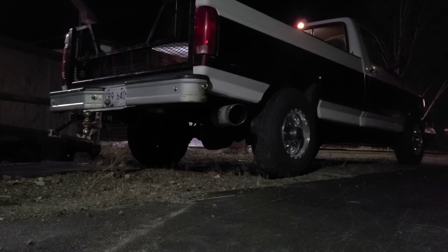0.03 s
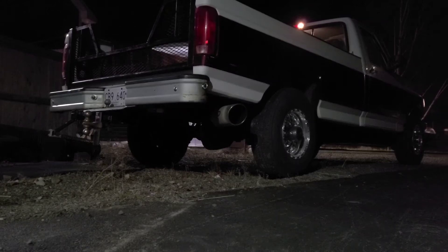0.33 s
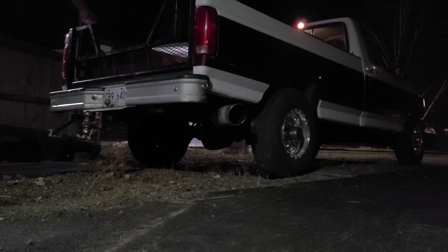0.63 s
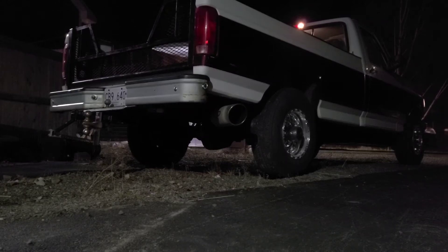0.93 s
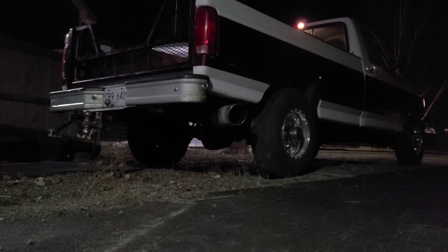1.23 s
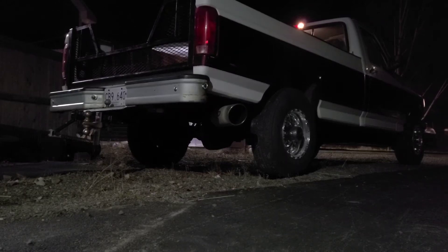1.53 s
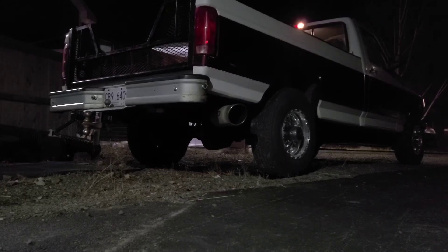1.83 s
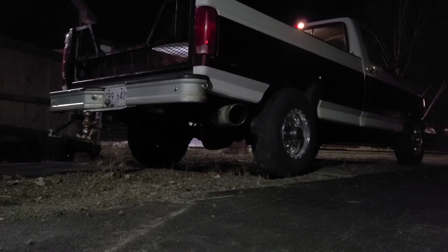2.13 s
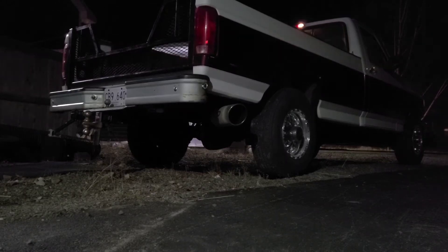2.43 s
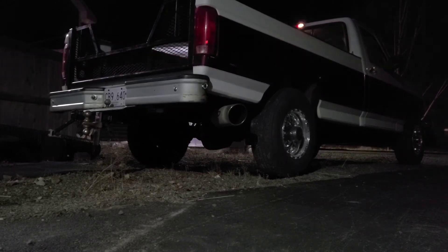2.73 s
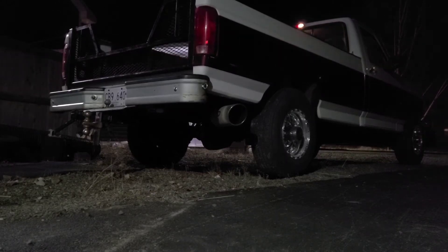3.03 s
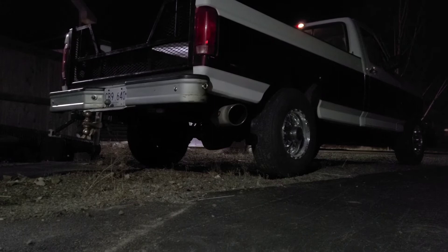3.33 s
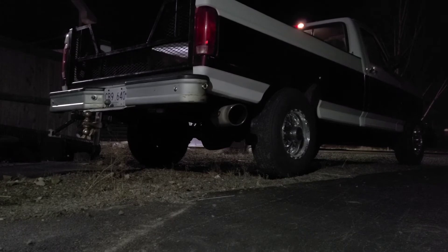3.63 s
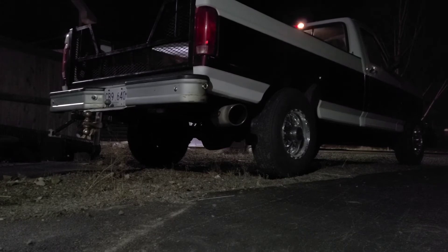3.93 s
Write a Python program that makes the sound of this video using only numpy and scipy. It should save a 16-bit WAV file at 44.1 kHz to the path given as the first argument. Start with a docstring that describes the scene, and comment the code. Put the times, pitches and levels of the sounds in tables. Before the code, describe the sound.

A diesel truck starts outdoors, heard from close behind. After soft wind and a faint electric buzz, the starter clanks and cranks in quickening, whining pulses until the cylinders fire with hard knocks and a barking exhaust.

```python
"""A diesel pickup starts from cold on a quiet night, heard from behind, near its tailpipe.
First a light breeze bumps the microphone over a distant hush and a faint electric buzz. At 2.3 s the
starter clacks in, then grinds and whines under each compression stroke as pumped air rings the tailpipe.
From 3.5 s the cylinders catch one by one with hard knocks, and from 3.7 s the exhaust thumps and barks."""
import sys
import numpy as np
from scipy import signal
from scipy.fft import rfft, irfft, next_fast_len
from scipy.io import wavfile
from scipy.ndimage import uniform_filter1d, map_coordinates

SR = 44100
rng = np.random.default_rng(int(sys.argv[2]) if len(sys.argv) > 2 else 0)


def transcribe(u):
    """Save the signal u as a 16-bit wav file named by the first command-line argument.

    u: samples, shape (n,) or (channels, n), limited to [-1, 1]; the rate is SR.
    q: integer samples, one column per channel.
    """
    v = np.clip(np.atleast_2d(u).T, -1, 1)
    q = np.round(v * 32767).astype(np.int16)
    wavfile.write(sys.argv[1], SR, q)


N = 176400
TIME = np.arange(N) / SR
HALF_EACH_WAY = np.array([[.5], [-.5]])  # shares a left-minus-right difference between the channels


def amp(db):
    """Amplitude grows tenfold for every 20 dB."""
    return 10 ** (np.asarray(db) / 20)


def along(points, hz):
    """Interpolation of (frequency, value) points on a logarithmic frequency axis."""
    corner_hz, values = np.transpose(points)
    return np.interp(np.log(hz + 1), np.log(corner_hz + 1), values)


def wobble(rate):
    """Smooth random modulation: a spline through `rate` Gaussian values a second."""
    return map_coordinates(rng.standard_normal(4096), [TIME * rate], mode="wrap")


def filtered(x, response):
    """Linear filtering: the spectrum is multiplied by a frequency response."""
    size = next_fast_len(N + SR // 2)
    return irfft(rfft(x, size) * response(np.fft.rfftfreq(size, 1 / SR)), size)[..., :N]


# Likeness of the truck's sound in the two channels. Each row: frequency in Hz, correlation.
COHERENCE = [(60, 0.97), (600, 0.98), (1300, 0.48), (2800, 0.69), (5500, 0.55), (12000, 0.085)]


def spread(pair, coherence=COHERENCE):
    """Partial coherence: two independent signals mix as mid and side into stereo of rms 1."""
    def weights(hz):
        angle = np.arccos(np.clip(along(coherence, hz), -1, 1)) / 2
        return np.array([np.cos(angle), np.sin(angle)])
    mid, side = filtered(pair, weights)
    stereo = np.array([mid + side, mid - side])
    return stereo / np.sqrt(np.mean(stereo ** 2) + 1e-20)


def noise(spectrum, coherence=COHERENCE, gate=1):
    """Source and filter: white noise is modulated by a gate, then coloured; stereo, rms 1."""
    source = gate * rng.standard_normal((2, N))
    return spread(filtered(source, lambda hz: amp(along(spectrum, hz))), coherence)


def burst(start, attack, t60):
    """Envelope of a damped transient: a linear rise, then a fall of 60 dB in t60 seconds."""
    envelope = np.zeros(N)
    span = slice(int(start * SR), int((start + attack + t60) * SR))
    age = np.arange(*span.indices(N)) / SR - start
    envelope[span] = np.clip(age / attack, 0, 1) * amp(-60 * np.maximum(age - attack, 0) / t60)
    return envelope


def struck(hits, modes, attack, scatter_db):
    """Modal superposition: each hit (s, dB) excites damped modes (Hz, dB, t60 s) in a random balance."""
    ringing = np.zeros(N + SR)
    age = np.arange(SR // 2) / SR
    shapes = np.array([amp(db - 60 * age / t60) * np.sin(2 * np.pi * hz * age) for hz, db, t60 in modes])
    shapes *= np.clip(age / attack, 0, 1)
    for start, db, *_ in hits:
        strengths = amp(db + scatter_db * rng.standard_normal(len(modes)))
        ringing[round(start * SR):][:len(age)] += strengths @ shapes
    return ringing[:N]


# Spectrum of the distant hush. Each row: frequency in Hz, relative level in dB.
HUSH_SPECTRUM = [(15, -72), (25, -29), (82, -6), (119, -10.5), (169, -9.5), (221, -18.5), (399, -20.5),
                 (433, -23.5), (567, -24.5), (919, -31.5), (1410, -28.5), (5280, -45.5), (5880, -41.5),
                 (7500, -56.5), (15500, -48.5)]
# Partials of the electric buzz. Each row: frequency in Hz, rms level in dB.
BUZZ_PARTIALS = [(406, -66.5), (5475, -85), (5679, -85), (5884, -89.5), (6085, -84), (6288, -82.5)]


def night():
    """A diffuse field, coherent only at long wavelengths, lies under a steady electric buzz."""
    hush = amp(-47.5) * noise(HUSH_SPECTRUM, coherence=[(60, 1.0), (300, 0.67), (1200, 0)])
    buzz = sum(amp(db) * np.sqrt(2) * np.sin(2 * np.pi * hz * TIME) for hz, db in BUZZ_PARTIALS)
    return hush + buzz


# Course of the breeze. Each row: time in seconds, relative level in dB, left minus right in dB.
GUSTS = [(0.0, -49, -2), (0.15, -63, 0), (0.18, -41.5, 16), (0.25, -66, -6.0), (0.38, -44, 9),
         (0.59, -55, -6), (0.92, -55, 6), (1.05, -49, -12), (1.12, -56, 3.5), (1.27, -45, -9),
         (1.56, -35, -13), (1.6, -32, 2.5), (1.83, -34, -7.5), (1.87, -40.5, 14), (1.92, -40, 14.5),
         (1.96, -46, -16), (2.05, -47.5, -15), (2.32, -33.5, 7.5)]
# Spectrum of the buffeting. Each row: frequency in Hz, relative level in dB.
GUST_SPECTRUM = [(20, -10), (45, 0.5), (80, 3), (130, -12.5), (190, -15.5), (300, -31.5), (600, -53.5),
                 (1300, -100)]


def breeze(gain_db=5.5, flicker_db=3.7):
    """Turbulent pressure is local, so each microphone port rumbles independently."""
    times, level_db, balance_db = np.transpose(GUSTS)
    ports_db = np.interp(TIME, times, level_db, right=-43)
    ports_db = ports_db + np.interp(TIME, times, balance_db, right=0) * HALF_EACH_WAY
    ports_db = uniform_filter1d(ports_db, size=900, axis=1)
    envelope = amp(gain_db + ports_db + flicker_db * wobble(22.03))
    return envelope * noise(GUST_SPECTRUM, coherence=[(60, 0)])


# Modes of the bell housing and frame. Each row: frequency in Hz, bandwidth in Hz, relative gain in dB.
HOUSING_MODES = [(300.7, 20.6, -0.5), (449, 21, 6), (523, 18, 0.5), (593, 18, 2), (708, 26, 4),
                 (754.6, 8.9, 7.5), (902, 38, -0.5), (942, 29, 1.5), (990, 84, -0.5), (1255, 70, 0.5),
                 (1442, 93, -3.5), (1790, 97, -6), (2250, 390, -9)]


def housing(force):
    """Forced vibration: the bell housing and frame respond as resonators of alternating sign."""
    def response(hz):
        return sum((-1) ** k * amp(db) * 1j * hz * width / (centre ** 2 - hz ** 2 + 1j * hz * width)
                   for k, (centre, width, db) in enumerate(HOUSING_MODES))
    return spread(filtered(force, response))


# Impacts of solenoid, pinion and ring gear.
# Each row: start in seconds, clank level in dB, click level in dB, t60 in seconds.
PINION_IMPACTS = [(2.337, -33.5, -37.5, 0.36), (2.362, -22.5, -26, 0.11), (2.378, -16, -36, 0.11)]
# Spectrum of the clicks and of the starter's rasp. Each row: frequency in Hz, relative level in dB.
RASP_SPECTRUM = [(1500, -10.5), (2900, -1.5), (3800, -12.5), (4900, -10), (6200, -7.5), (7400, -11.5),
                 (8200, -11), (9500, -19), (11200, -11.5), (13500, -21), (16000, -20.5)]


def engagement():
    """Impact excitation: the solenoid throws the pinion into the ring gear and the housing clanks."""
    clank = sum(amp(db) * burst(start, 0.00069, t60) for start, db, _, t60 in PINION_IMPACTS)
    click = sum(amp(db) * burst(start, 0.0015, t60) for start, _, db, t60 in PINION_IMPACTS)
    return clank * housing(rng.standard_normal((2, N))) + click * noise(RASP_SPECTRUM)


# Compression strokes. Each row: start, rasp rise time and length in seconds, gear and rasp levels in dB.
COMPRESSIONS = [(2.398, 0.09, 0.24, -3, -1), (2.714, 0.036, 0.18, 0, 0.5), (2.886, 0.018, 0.15, 0, 2),
                (3.052, 0.012, .13, 1.5, 2.5), (3.192, 0.0086, 0.114, 0.5, 3), (3.314, 0.01, .11, 2, 2.5),
                (3.444, 0.0098, 0.082, 1, 6), (3.558, 0.0052, 0.0734, 1, 6.5), (3.637, 0.016, .07, -1, 9.5)]


def compression(rasp_lead_s=0.091, rasp_t60=0.58):
    """Compressed air resists the piston: each stroke gives an arch of gear load and a swell of rasp."""
    load, scrape = np.zeros((2, N))
    for start, rise, length, gear_db, rasp_db in COMPRESSIONS:
        age = TIME - start
        span = (age > 0) & (age < length)
        load[span] += amp(gear_db) * np.sin(np.pi * (age[span] / length) ** 0.95) ** 0.41
        fall_db = 60 * np.maximum(age - (length - rasp_lead_s), 0) / rasp_t60
        scrape = np.maximum(scrape, np.clip(age / rise, 0, 1) * amp(rasp_db - fall_db))
    return load, scrape


# Starter speed, which sags on each compression.
# Each row: time in seconds, gear mesh frequency in Hz, relative whine level in dB.
MESH_COURSE = [(2.37, 330, -13), (2.45, 445, -9), (2.55, 524.3, -9), (2.6, 600.6, 3.5), (2.66, 745, 2.5),
               (2.74, 745, -3.5), (2.795, 599.5, 1.5), (2.86, 753, 3), (2.9, 724, -16), (2.95, 601.8, 5),
               (3.04, 746.2, -12.5), (3.104, 608.3, 3), (3.149, 559.4, -10.5), (3.225, 696.6, 3),
               (3.27, 620.2, -20), (3.346, 701.8, 5), (3.372, 692.3, -16), (3.405, 754, 7),
               (3.435, 740, -17), (3.475, 630, 4), (3.54, 616.4, -19)]
# Harmonics of the gear whine. Each row: multiple of the mesh frequency, relative level in dB.
WHINE_HARMONICS = [(1, -30), (2, -38.5), (3, -45.5), (4, -49)]
# Spectrum of the grinding teeth. Each row: frequency in Hz, relative level in dB.
GRIND_SPECTRUM = [(90, -14), (230, -3.5), (440, 4.5), (545, -15), (700, -4), (830, -2.5), (1000, -10),
                  (1450, 1.5), (1600, -2.5), (2200, -5), (2650, -8), (3050, -8.5), (3400, -9), (3800, -29),
                  (6000, -30), (10000, -70)]


def starter(on_s=2.365, off_s=3.76, fade_s=0.01, inrush=2.5, inrush_s=0.39, flutter=0.012):
    """Gear meshing: periodic tooth contact whines and modulates friction noise that grows with load."""
    load, scrape = compression()
    running = np.clip((TIME - on_s) / fade_s, 0, 1) * np.clip((off_s - TIME) / fade_s, 0, 1)
    age = np.maximum(TIME - on_s, 0)
    # The motor strains harder while it first gathers speed.
    base_load = 0.26 * (1 + inrush * np.exp(-(age / inrush_s) ** 4))
    strain = np.maximum(load, base_load)
    times, pitches, whine_db = np.transpose(MESH_COURSE)
    mesh_hz = np.interp(TIME, times, pitches) * (1 + flutter * wobble(130))
    phase = 2 * np.pi * np.cumsum(mesh_hz) / SR
    teeth = amp(1.5 * np.cos(phase) + 0.75 * wobble(350))
    harmonics = sum(amp(db + 3.4 * wobble(70)) * np.sin(k * phase) for k, db in WHINE_HARMONICS)
    whine = np.sqrt(2) * amp(np.interp(TIME, times, whine_db)) * harmonics
    ring = amp(-28.5) * housing(teeth * rng.standard_normal((2, N)))
    grind = amp(-30) * noise(GRIND_SPECTRUM, gate=teeth)
    rasp = amp(-35) * (0.14 + scrape) * noise(RASP_SPECTRUM, gate=teeth)
    return running * (whine + strain * (ring + grind) + rasp)


# Air pumped out while cranking. Each row: start in seconds, relative level in dB.
AIR_PUFFS = [(2.406, -23.5), (2.646, -21.5), (2.799, -28), (2.904, -33), (3.08, -34.5), (3.201, -29),
             (3.36, -33), (3.484, -21.5), (3.599, -18.5), (3.66, -20)]
# Modes of the tailpipe. Each row: frequency in Hz, relative level in dB, t60 in seconds.
PIPE_MODES = [(37.5, -4, 0.083), (73.6, -1.5, 0.3), (108.6, -2, 0.47), (155, -11, .2)]


def puffs():
    """Air-column resonance: each soft puff from the cylinders rings the tailpipe."""
    return amp(1) * struck(AIR_PUFFS, PIPE_MODES, attack=0.0059, scatter_db=3)


# Ignitions. Each row: start in seconds, knock level in dB, sizzle level in dB, t60 in seconds.
IGNITIONS = [(3.525, -24.5, -47, 0.096), (3.611, -21, -42, 0.15), (3.652, -16, -33, 0.064),
             (3.686, -8, -21, 0.038), (3.718, -9.5, -17, 0.037), (3.745, -15.5, -19, 0.073),
             (3.77, -12.5, -15.5, 0.031), (3.818, -12, -15.5, 0.049), (3.843, -10.5, -12, 0.059),
             (3.877, -18, -19.5, 0.12), (3.899, -21, -25.5, 0.15), (3.915, -23.5, -27, 0.12),
             (3.955, -19, -27.5, 0.095), (3.986, -25, -58, .08)]
# Spectra of the block's knock and of the sizzle. Each row: frequency in Hz, relative level in dB.
BLOCK_SPECTRUM = [(300, 2), (770, -4.5), (1000, -14), (1200, -0.5), (1450, -6), (1900, 0), (2250, -4),
                  (2600, -4.5), (3050, 2.5), (3500, 0), (4100, -17), (5000, -15), (9000, -57)]
SIZZLE_SPECTRUM = [(2500, -39), (4150, -22), (4700, -1), (5200, -2.5), (5700, 2), (6200, -2.5),
                   (7400, -6.5), (8400, -1.5), (9900, -12.5), (11400, -3.5), (13000, -13), (16000, -7.5)]
# Modes of injection pump and manifolds. Each row: frequency in Hz, relative level in dB, t60 in seconds.
FITTING_MODES = [(1708, -5, 0.37), (2006, -4.5, 0.59), (2176, -3.5, 0.34), (2236, 1, 0.15),
                 (2937, -4, 0.091), (3030, 6, 0.13), (3150, -2, 0.13), (3310, -1, 0.13), (4540, -16, .15),
                 (5500, -6, 0.16), (8800, -9, .12)]


def combustion(rattle_db=2):
    """Diesel knock: each late cold ignition's pressure jump jolts the block and fittings, and sizzles."""
    knock = sum(amp(db) * burst(start, 0.0049, t60) for start, db, _, t60 in IGNITIONS)
    sizzle = sum(amp(db) * burst(start, 0.0048, t60) for start, _, db, t60 in IGNITIONS)
    rattle = amp(rattle_db * wobble(900))
    fittings = amp(-17) * struck(IGNITIONS, FITTING_MODES, attack=0.0018, scatter_db=2)
    block = knock * noise(BLOCK_SPECTRUM, gate=rattle)
    return block + sizzle * noise(SIZZLE_SPECTRUM, gate=rattle) + fittings


# Blasts of the firing engine. Each row: start in seconds, relative thump and bark levels in dB.
EXHAUST_BLASTS = [(3.713, -5, -18.5), (3.738, -8, -15), (3.766, -14, -16), (3.813, -5, -15),
                  (3.834, -6.5, -12.5), (3.879, -8.5, -15), (3.907, -19, -20), (3.937, -12, -12),
                  (3.952, -10, -20), (3.975, -6.5, -27), (3.990, -19, -16.5)]
# Spectrum of the bark. Each row: frequency in Hz, relative level in dB.
BARK_SPECTRUM = [(60, 1), (160, 8.5), (260, -2), (380, 1), (540, -4), (650, -5), (780, 1.5), (1000, -16.5),
                 (2500, -30.5)]


def exhaust():
    """Pulse excitation: each blast thumps two low pipe modes and barks with a burst of noise."""
    thump_modes = [(75.6, 1, 0.21), (108, -7, 0.09)]
    thumps = -amp(-2) * struck(EXHAUST_BLASTS, thump_modes, attack=0.0049, scatter_db=2.5)
    bark = sum(amp(db) * burst(start, attack=0.0018, t60=0.11) for start, _, db in EXHAUST_BLASTS)
    return thumps + bark * noise(BARK_SPECTRUM)


# Decay of the yard's reflections. Each row: frequency in Hz, t60 in seconds.
YARD_DECAY = [(100, 0.3), (1500, 0.35), (12000, 0.28)]


def yard(source):
    """Reverberation: ground, underbody and a nearby wall answer as a short noise tail, weak in bass."""
    diffuse = spread(rng.standard_normal((2, N)))[:, :SR // 2]
    band_hz, age, bands = signal.stft(diffuse, SR, nperseg=256)
    decay = amp(-60 * age / along(YARD_DECAY, band_hz)[:, None])
    tail = signal.istft(bands * decay, SR, nperseg=256)[1]
    reflections = signal.fftconvolve(source, tail / np.linalg.norm(tail[0]), axes=1)[:, :N]
    return filtered(reflections, lambda hz: amp(along([(110, -14), (400, 3)], hz)))


# Stereo balance of the truck. Each row: frequency in Hz, left minus right in dB.
TRUCK_BALANCE = [(60, 1.5), (500, 1.5), (1100, -2.6), (2200, -1), (3300, -3), (5500, -2), (9000, -2),
                 (14000, -5.5)]


def scene(starter_lag_s=0.00017):
    """Superposition: truck, reflections and night air add; the starter reaches the right port first."""
    delays = starter_lag_s * HALF_EACH_WAY
    cranking = filtered(engagement() + starter(), lambda hz: np.exp(-2j * np.pi * hz * delays))
    truck = cranking + puffs() + combustion() + exhaust()
    truck = truck + amp(-7.5) * yard(truck)
    truck = filtered(truck, lambda hz: amp(along(TRUCK_BALANCE, hz) * HALF_EACH_WAY))
    return night() + breeze() + truck


def record(dry):
    """Soft saturation rounds the loudest peaks; a low-pass filter then limits the band."""
    rounded = dry / (1 + np.abs(dry) ** 6) ** (1 / 6)
    return filtered(rounded, lambda hz: hz < 16050)


dry = scene()
out = record(dry)
transcribe(out)
```